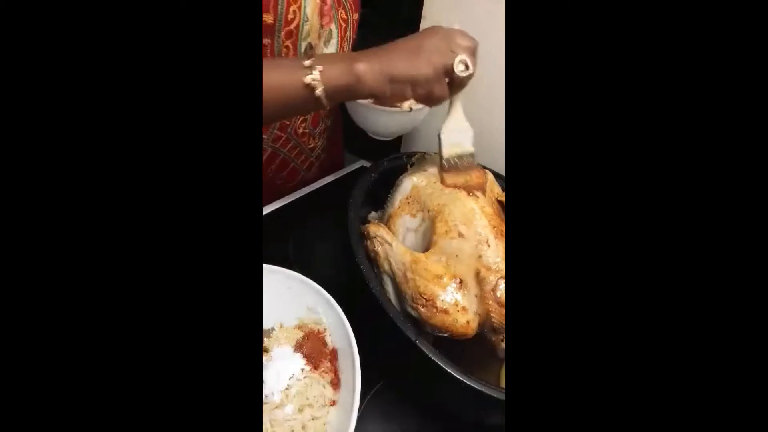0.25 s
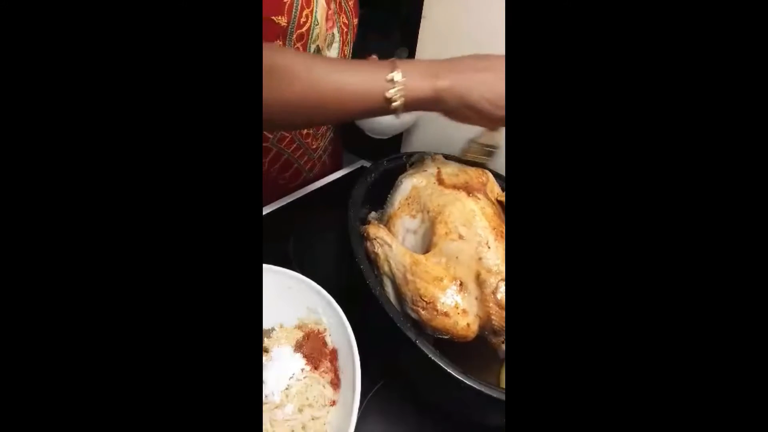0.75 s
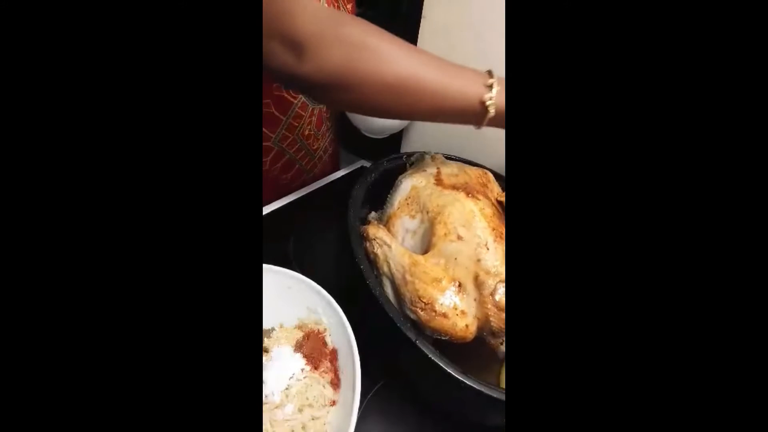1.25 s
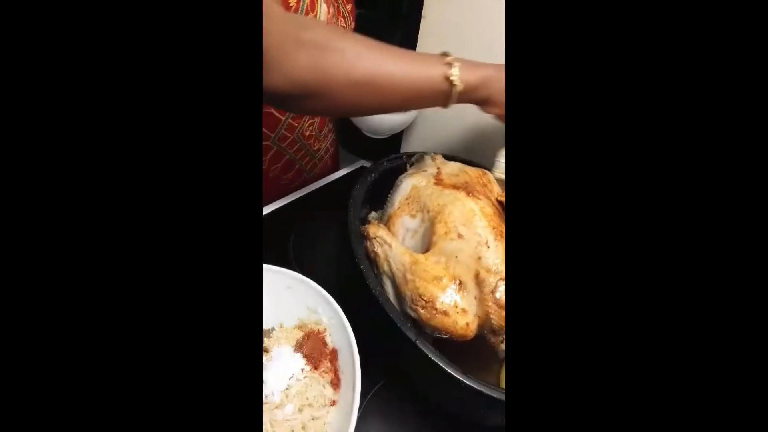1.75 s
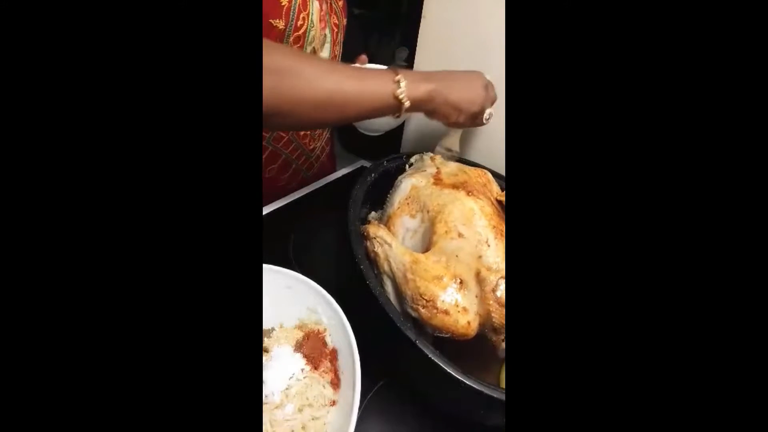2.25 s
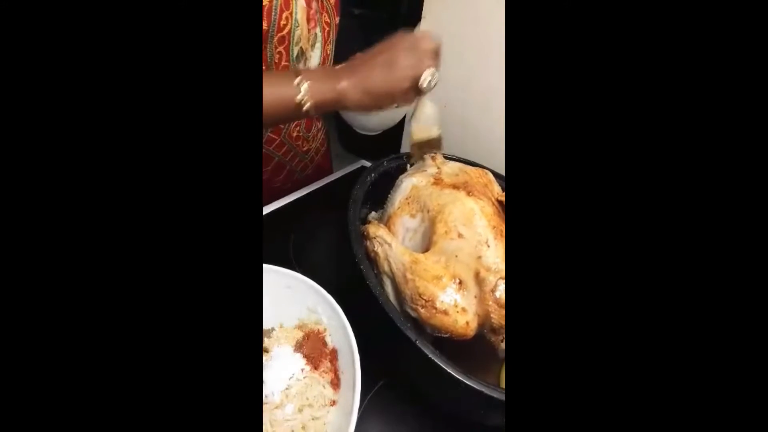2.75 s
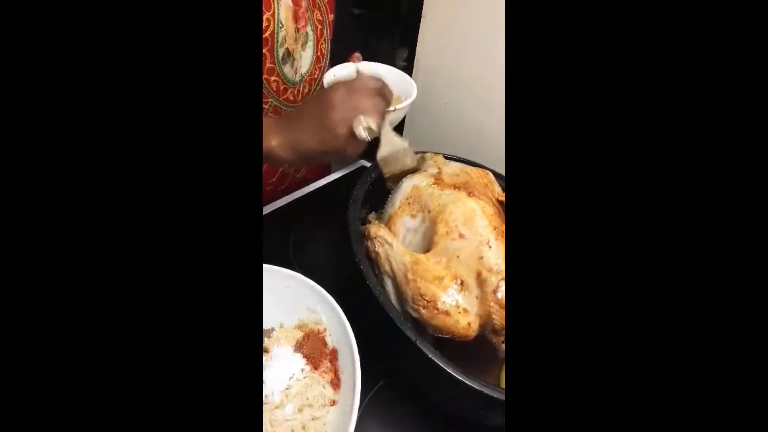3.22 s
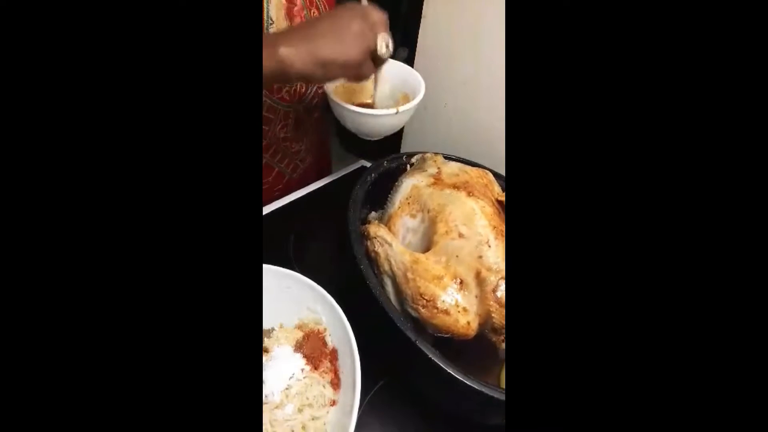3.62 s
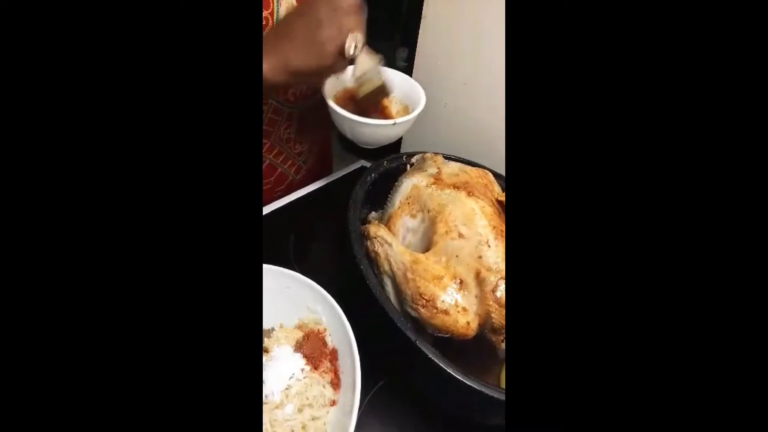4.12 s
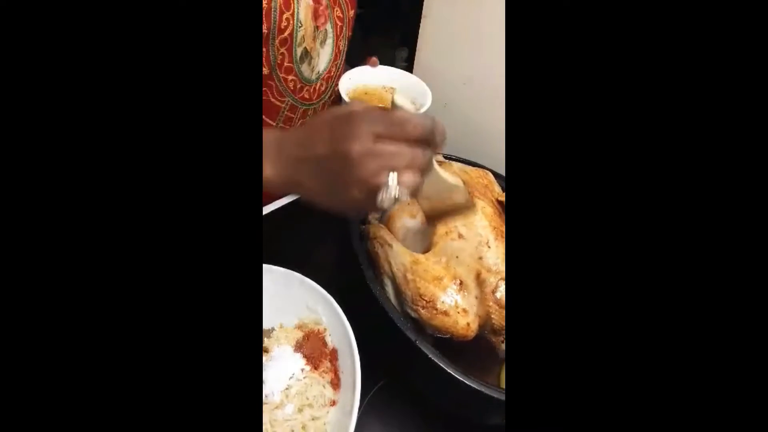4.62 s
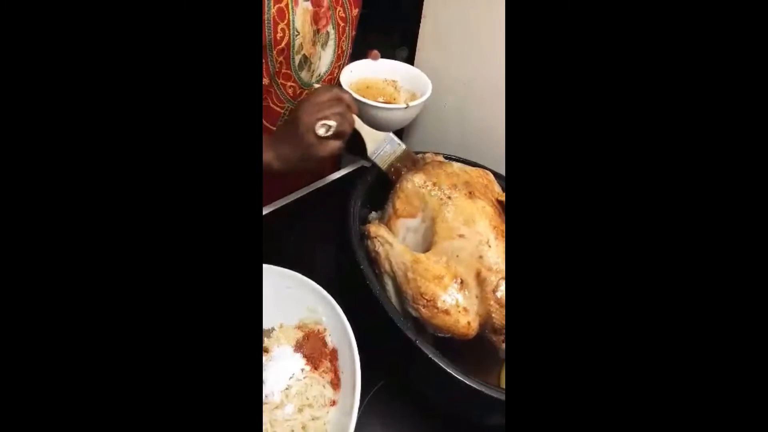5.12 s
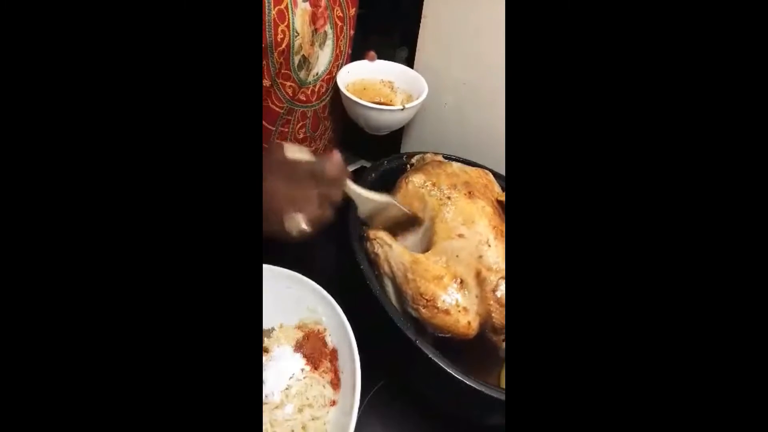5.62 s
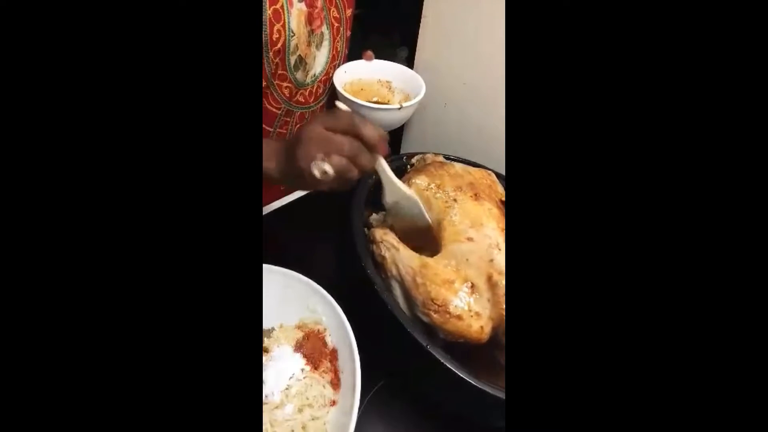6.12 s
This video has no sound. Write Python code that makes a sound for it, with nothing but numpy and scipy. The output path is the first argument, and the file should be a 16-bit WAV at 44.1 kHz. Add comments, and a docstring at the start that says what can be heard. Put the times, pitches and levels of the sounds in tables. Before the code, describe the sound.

Close stereo microphone in a small, short-echoing kitchen with low hum and soft air. Buttery bristles hiss, smack and pop delicately on roast skin over dull bumps. A bowl clinks and is wiped just after two seconds; brushing grows busier, then thins out. Near five seconds the brush cracks against the dish rim twice, bright with a tiny squeak, before light taps and wet strokes finish.

```python
"""A basting brush works between a ceramic bowl of melted butter and a roast in its dish, in a small kitchen.
Throughout, an appliance hums (sines) over room air and rumble (coloured noise). From the start, wet bristles
swish (clumped noise bursts), smack and pop (bubble pings) on the skin, over soft bumps (low noise). Near 2 s the
bowl clinks with its rebounds, and is wiped (dying sines); near 4 s a faint thin tone swells (narrow noise). Near
5 s the brush twice knocks and squeaks on the dish's rim (noise, gliding tone, modes); taps, drags, strokes follow."""
import sys
import numpy as np
from scipy import signal
from scipy.io import wavfile
from scipy.ndimage import uniform_filter1d

SR = 44100
rng = np.random.default_rng(int(sys.argv[2]) if len(sys.argv) > 2 else 0)


def digitize_waveform(pressure):
    """Quantize a signal to 16-bit integers and store it at the path in sys.argv[1].

    Rows of a 2-D input are taken as channels; values are limited to [-1, 1].
    """
    field = np.atleast_2d(pressure).T
    bounded = np.clip(field, -1, 1)
    quanta = np.round(bounded * 32767).astype(np.int16)
    wavfile.write(sys.argv[1], SR, quanta)


N = 280812


def amp(db):
    """Logarithmic level: decibels to amplitude gain."""
    return 10 ** (np.asarray(db) / 20)


def unit(x):
    """Normalisation: scales to rms 1."""
    return x / np.sqrt(np.mean(x ** 2) + 1e-20)


def sized(x, db, size):
    """Energy equivalence: gives x the energy of size samples per port at rms level db."""
    return x * amp(db) * np.sqrt(2 * size) / (np.linalg.norm(x) + 1e-20)


def read(points, hz):
    """Interpolation of (f/Hz, value) points on a log-frequency axis."""
    f, value = np.transpose(points)
    return np.interp(np.log(hz + 1), np.log(f + 1), value)


def add(mix, s, sound):
    """Superposition: mixes a sound in at s seconds."""
    part = mix[:, round(s * SR):][:, :sound.shape[-1]]
    part += sound[..., :part.shape[-1]]


def colour(x, points, size=2048):
    """Minimum-phase filtering: a causal response of unit energy with the given spectrum."""
    log_gain = np.log(amp(read(points, abs(np.fft.fftfreq(size, 1 / SR)))))
    spectrum = np.exp(np.conj(signal.hilbert(log_gain)))
    response = np.fft.ifft(spectrum).real[:size // 2]
    return signal.fftconvolve(x, response[None] / np.linalg.norm(response), axes=1)[:, :N]


def pair(size, alike):
    """Partial coherence: white noise at two ports sharing the fraction alike of its power."""
    shared, own = rng.standard_normal(size), rng.standard_normal((2, size))
    alike = np.clip(alike, 0, 1)
    return np.sqrt(alike) * shared + np.sqrt(1 - alike) * own


def ring(modes, lag=.0002, vary_db=0):
    """Modal superposition: dying sines of alternating sign, heights varying by spot struck, timing by port."""
    t = np.arange(SR) / SR
    total = np.zeros((2, SR))
    for k, (hz, db, t60) in enumerate(modes):
        decay = amp(db + vary_db * rng.standard_normal() - 60 * t / t60)
        port_time = t + lag * rng.uniform(-1.8, 1, (2, 1))
        total += (-1) ** k * decay * np.sin(2 * np.pi * hz * port_time)
    return total


def shade(x, spread=.002, depth=0.65, count=4):
    """Comb interference: a few very short echoes off nearby surfaces give each contact its own colour."""
    echoes = np.zeros((2, int(spread * SR) + 4))
    echoes[:, 0] = 1
    at = rng.integers(3, echoes.shape[1], count)
    echoes[:, at] = depth * (rng.choice([-1, 1], count) + .5 * rng.standard_normal((2, count)))
    return signal.fftconvolve(x, echoes / np.linalg.norm(echoes, axis=1, keepdims=True), axes=1)


def wander(per_s):
    """Slow random modulation: a curve of about unit size."""
    return np.interp(np.arange(N) / SR * per_s, np.arange(256), rng.standard_normal(256))


def patchy(x, depth_db, patch_s, patch_hz):
    """Time-frequency modulation: the colour of a sound shifts in patches."""
    z = signal.stft(x, SR, nperseg=1024)[2]
    field = rng.standard_normal(z.shape[1:])
    field = uniform_filter1d(field, max(1, round(patch_s * SR / 512)), axis=1)
    field = unit(uniform_filter1d(field, max(1, round(patch_hz * 1024 / SR)), axis=0))
    return signal.istft(z * unit(amp(depth_db * field)), SR, nperseg=1024)[1][:, :N]


PORT_LAG_S = .00022


def from_right(x):
    """Interaural-style delay: bowl and dish reach the left port a moment after the right one."""
    return np.array([np.pad(x[0], (round(PORT_LAG_S * SR), 0))[:x.shape[1]], x[1]])


def kitchen(x, treble_t60=0.21, middle_t60=0.32, bass_t60=0.45, near_t60=0.099, near_db=3, mono_hz=450,
            first_per_s=700, thicken_s=.04):
    """Reverberation, echoes only: separate ones from worktop and wall thicken into the small room's tail."""
    t = np.arange(SR // 2) / SR
    density = np.minimum(first_per_s / SR * (1 + (t / thicken_s) ** 2), 1)
    present = rng.random((2, len(t))) < density
    onset = np.clip(t / 0.0018 - 1, 0, 1)
    echoes = rng.standard_normal((2, len(t))) * present / np.sqrt(density) * onset
    hz, at, z = signal.stft(echoes, SR, nperseg=256)
    alike = np.exp(-(hz[:, None] / mono_hz) ** 2)  # long waves reach both ports alike
    z[1] = alike * z[0] + np.sqrt(1 - alike ** 2) * z[1]
    t60 = read([(400, bass_t60), (2000, middle_t60), (8000, treble_t60)], hz)[:, None]
    decay = amp(-60 * at / t60) + amp(near_db - 60 * at / near_t60)
    tail = signal.istft(z * decay, SR, nperseg=256)[1]
    return signal.fftconvolve(x, tail / np.linalg.norm(tail, axis=1, keepdims=True), axes=1)[:, :N]


# partials of the appliance: (f/Hz, rms level/dB)
HUM = [(59.4, -67.5), (119.9, -68), (161, -82), (241, -78.5), (403, -83), (603, -83.5), (645, -87),
       (725, -79.5), (768, -83.5), (804, -86.5)]
# relative spectrum of the low rumble: (f/Hz, level/dB)
RUMBLE = [(20, -20), (45, -2), (65, 0.5), (100, -2), (150, -0.5), (250, -22.5), (1000, -72)]
# relative spectrum of the room's air: (f/Hz, level/dB)
AIR = [(100, -26), (170, -16.5), (205, -12), (250, 1), (400, -4.5), (500, -17.5), (620, -2.5), (800, -2.5),
       (1150, -13.5), (2300, -23.5), (4000, -27), (6800, -28), (8100, -16), (10000, -25.5), (12500, -28.5),
       (14000, -47.5)]


def background(waver=0.15, air_db=-70, rumble_db=-75, flutter_db=4, steady_hz=250):
    """Harmonic and broadband noise: a hum, steady below and fluttering above, over gently shifting air."""
    t = np.arange(N) / SR
    hum = np.zeros((2, N))
    for hz, db in HUM:
        loose = 1 - np.exp(-(hz / steady_hz) ** 2)  # 0 for a steady partial, 1 for one that comes and goes
        phase = 2 * np.pi * (hz * t + rng.random())
        phase = phase + waver * np.sqrt(hz / HUM[0][0]) * wander(per_s=2.7)
        flutter = amp(loose * flutter_db * wander(per_s=5))
        hum += amp(db) * unit(flutter * np.sin(phase + loose * rng.uniform(-1.3, 1, (2, 1))))
    air = colour(pair(N, 0.19), [(30, -22.0)] + AIR)
    air = unit(patchy(air, depth_db=3.0, patch_s=.12, patch_hz=170))
    rumble = unit(colour(pair(N, 1.0), RUMBLE, size=8192))
    return hum + amp(air_db) * air + amp(rumble_db) * rumble


# a faint thin tone that comes and goes: (start t/s, length/s, f/Hz)
WHINE = (4.1, 0.65, 2350)


def whine(level_db=-80, width_hz=120):
    """Narrow-band filtering: a resonance turns noise into a thin tone that swells and fades."""
    s, length, hz = WHINE
    out, size = np.zeros((2, N)), round(length * SR)
    swell = pair(size, 0.34) * np.hanning(size)
    tone = signal.lfilter(*signal.iirpeak(hz, hz / width_hz, SR), swell)
    add(out, s, sized(tone, level_db, size / 2))
    return out


# soft bumps of the roast and dish giving under the brush: (t/s, level/dB, length/s)
BUMPS = [(0.328, -74, 0.058), (2.058, -53, 0.058), (2.893, -65.5, 0.13), (3.259, -61, 0.087),
         (3.637, -58, 0.12), (3.768, -61.5, 0.08), (5.228, -56.5, 0.092), (5.863, -60, 0.095),
         (5.979, -57.5, 0.049)]
# dull resonances, the same for every bump, relative: (f/Hz, level/dB)
BUMP = [(40, -45), (90, -20), (165, 4.5), (200, -16), (270, -21), (335, -6.5), (420, -18), (900, -44)]


def bumps():
    """Forced low resonance: each push is a swell of noise in the low resonances of roast and dish."""
    out = np.zeros((2, N))
    for s, db, length in BUMPS:
        size = round(length * SR)
        push = pair(size, 1.0) * np.hanning(size)
        add(out, s, sized(colour(push, BUMP, size=4096), db, size / 2))
    return out


def scrape(body, length, db, slips_per_s=600, uneven_db=4):
    """Stick-slip excitation: a run of uneven slips swells and fades, each one ringing the body."""
    size = round(length * SR)
    count = 2 + int(slips_per_s * length)
    slips = np.zeros((1, size))
    heights = rng.choice([-1, 1], count) * amp(uneven_db * rng.standard_normal(count))
    slips[0, rng.integers(0, size, count)] = heights
    return sized(signal.fftconvolve(slips * signal.windows.tukey(size, .5), body, axes=1), db, size)


# the pressed brush sets the dish and its own stock going, before the left trim and the room:
# (t/s, length/s, dish level/dB, stock level/dB)
DRAGS = [(4.977, 0.056, -52.5, -55.5), (5.719, 0.047, -67, -88), (5.803, .06, -67, -73),
         (5.863, .085, -54, -61.5), (6.312, 0.043, -73, -67.5)]
# the bristles wipe over the bowl's lip and keep it singing, before trim and room: (t/s, length/s, level/dB)
WIPES = [(2.262, 0.094, -64.5)]


def drags(damped_t60=0.2, left_db=-2, room_db=-8):
    """Friction-driven modes: the brush shakes the dish, damped by the pressing hand, and wipes the bowl."""
    out = np.zeros((2, N))
    dish = ring(THUD, lag=.0001) * amp(-60 * np.arange(SR) / SR / damped_t60)
    for s, length, dish_db, stock_db in DRAGS:
        add(out, s, scrape(dish, length, dish_db))
        add(out, s, scrape(ring(STOCK, lag=.00007, vary_db=3.5), length, stock_db))
    for s, length, db in WIPES:
        add(out, s, scrape(ring(BOWL, lag=.00006), length, db))
    return from_right(out) * amp([[left_db], [0]]) + amp(room_db) * kitchen(out)


# light taps of the brush's stock on the dish, gain on its ring: (t/s, level/dB)
TAPS = [(2.903, -58.5), (3.194, -61), (4.933, -44.5), (4.989, -50), (5.011, -47), (5.428, -39.5),
        (5.441, -47.5), (6.0095, -39), (6.053, -56), (6.063, -61.5), (6.099, -59)]
# short ring of the stock, mean relative heights: (f/Hz, level/dB, t60/s)
STOCK = [(606, -3, 0.079), (686, -5, 0.057), (1120, -9, 0.022), (1247, -5.5, 0.041), (1782, -6, 0.043),
         (2210, -3.5, 0.033), (2600, -1, 0.035), (2905, -4.5, 0.029), (3286, -5, 0.04), (4360, -11, 0.046)]


def taps(room_db=-11):
    """Impulsive excitation: the stock of the brush rings briefly wherever it touches the dish."""
    out = np.zeros((2, N))
    for s, db in TAPS:
        add(out, s, amp(db) * ring(STOCK, lag=.00007, vary_db=3))
    return out + amp(room_db) * kitchen(out)


# single bubbles of butter that pop out clearly: (t/s, peak level of the ping's envelope/dB, f/Hz, decay/s)
POPS = [(.3455, -45.5, 6580, 0.0017), (.345, -51.5, 4040, 0.0015), (0.381, -48, 8400, .0008),
        (0.379, -74, 3660, 0.0034), (.741, -39.5, 8370, 0.00024), (2.3378, -48, 10400, 0.00019),
        (2.707, -36, 9060, 0.00032), (2.714, -40, 8250, 0.00037), (2.722, -50, 8600, 0.0033),
        (2.903, -50, 8900, 0.0027), (2.918, -38, 8900, .0006), (2.9562, -43.5, 8850, .001),
        (2.998, -46, 8750, 0.0011), (3.0603, -43.5, 8900, 0.0012), (3.181, -38.5, 9040, 0.00053),
        (3.183, -53, 7040, 0.0026), (3.195, -48, 8200, 0.00066), (3.312, -38, 9100, 0.0014),
        (3.618, -42.5, 8350, .0005), (4.899, -65, 8740, 0.00055), (5.7172, -49, 6770, .0008),
        (5.7392, -48, 6270, 0.0013), (5.753, -48.5, 6550, 0.0017), (5.911, -33.5, 9900, 0.00023),
        (5.9853, -53, 6750, .0012), (6.0089, -31, 8700, 0.00052), (6.1, -47, 7440, 0.00053),
        (6.179, -38, 8260, 0.00029)]


def pops(snap_db=-13, snap_s=.0004, room_db=-10, lag=.00002):
    """Bubble resonance: a film of butter snaps and the bubble under it pings."""
    out, t = np.zeros((2, N)), np.arange(SR // 25) / SR
    for s, db, hz, decay in POPS:
        envelope = t / decay * np.exp(1 - t / decay)
        ping = envelope * np.sin(2 * np.pi * hz * (t + lag * rng.uniform(-0.86, 1, (2, 1))))
        snap = colour(pair(len(t), 0.46) * np.exp(-t / snap_s), BRISTLES)
        add(out, s, amp(db) * ping)
        add(out, s, amp(db + snap_db) * snap)
    return out + amp(room_db) * kitchen(out)


def bubbles(length, hz, per_s=450, spread=0.147, cycles=11, lag=.00004):
    """Bubble resonance in series: tiny bubbles burst one after another, each a ping of its own pitch."""
    t = np.arange(round((length + .01) * SR)) / SR
    out = np.zeros((2, len(t)))
    count = 2 + int(per_s * length)
    for at in (np.arange(count) + rng.random(count)) / count * length:
        pitch = np.clip(hz * np.exp(spread * rng.standard_normal()), 3000, 10800)
        age = np.maximum(t - at - lag * rng.uniform(0, 2.57, (2, 1)), 0) * pitch  # in cycles
        height = rng.uniform(0.65, 1, (2, 1)) * np.exp(-at / length)
        out += height * age / cycles * np.exp(-2 * age / cycles) * np.sin(2 * np.pi * age)
    return out


# bristles land on or peel off the skin, base level before the part trims:
# (t/s, level/dB, length/s, slap relative to base/dB, centre of the butter's fizz f/Hz)
SMACKS = [(0.343, -43, 0.015, -13, 7600), (0.376, -49, 0.01, -7.5, 9160), (1.363, -53.5, 0.0058, -27, 8670),
          (2.232, -67, .005, 0, 8200), (2.296, -61, 0.0045, -14, 8800), (2.334, -53, 0.011, -6, 6500),
          (2.367, -55, 0.0039, -13, 8900), (2.625, -48, 0.0064, -19, 9000),
          (2.709, -46.5, 0.017, -12, 8200), (2.89, -61.5, 0.012, 3, 8560), (2.915, -41, 0.0081, -15, 8850),
          (2.956, -47.5, 0.0047, -14, 8900), (2.995, -48.5, 0.011, -3.5, 8160),
          (3.051, -43.5, .018, -17.5, 8460), (3.176, -45.5, 0.013, -8, 8300), (3.29, -51, 0.011, -20, 9300),
          (3.309, -41, 0.008, -22, 9400), (3.617, -54.5, .004, -14, 8760), (3.656, -63, 0.027, -9, 5020),
          (4.473, -53.5, 0.023, -9.5, 5050), (4.472, -50, 0.02, -7, 8100),
          (4.675, -46.5, 0.0047, -11.5, 9250), (4.711, -48, 0.004, -10, 9000),
          (4.982, -45.5, .006, -4, 8000), (5.007, -42, 0.006, -2, 8700), (5.026, -49, 0.0094, -3.5, 8460),
          (5.07, -44, 0.0082, -24, 8150), (5.639, -52, 0.0089, -10, 9100), (5.714, -45, 0.0049, -14, 8900),
          (5.736, -49, 0.0097, -5.5, 8800), (5.751, -51, 0.011, -5.5, 8200),
          (5.817, -51, 0.014, -11.5, 8940), (5.983, -46.5, 0.016, -7, 8260), (6.01, -36.5, 0.01, -5, 8800),
          (6.101, -50, 0.02, -4, 8360), (6.161, -55, 0.0085, -3, 8650), (6.255, -53, 0.0062, -3.5, 9100),
          (6.32, -52, 0.011, -2, 8800)]
# relative spectrum of the fleshy slap: (f/Hz, level/dB)
SLAP = [(100, -15.5), (250, 3.5), (450, -3.5), (700, 7), (1100, -1), (1700, -6), (2500, -8), (3800, -3.5),
        (6000, -7.5), (12000, -34)]


def smacks(grain_db=6.0, skirt_db=-12, room_db=-7, rise_share=0.52, fizz_db=-5.0, bubble_db=-2):
    """Burst superposition: each smack is a clump of bursting butter bubbles and fizz over a soft slap."""
    out = np.zeros((2, N))
    for s, db, length, slap_db, hz in SMACKS:
        fizz = [(1000, -35), (hz * 0.52, skirt_db), (hz * 0.56, -5), (hz, 0), (hz * 1.23, -6),
                (hz * 1.37, -19), (14000, -44)]
        t, size = np.arange(round(2 * length * SR)) / SR, length * SR * 0.39
        swell = np.minimum(t / (rise_share * length), 1) * np.exp(-(t / length) ** 2)
        grains = amp(grain_db * np.minimum(rng.exponential(1, len(t)), 4))
        crackle = shade(pair(len(t), 0.4) * grains * swell)
        add(out, s, sized(bubbles(length, hz), db + bubble_db, size))
        add(out, s, sized(colour(crackle, fizz), db + fizz_db, size))
        add(out, s, sized(colour(crackle, SLAP), db + slap_db, size))
    return out + amp(room_db) * kitchen(out)


# a clump of bristles bends onto the skin, then trails off it; CLUMP_S is the mean spacing in long strokes
CLUMP_S, CLUMP_ATTACK_S, CLUMP_RELEASE_S = .022, 0.019, 0.018


def bristle_drive(length, grain_db=6, flicks_per_s=1100):
    """Clustered release: clump after clump of bristles lets go, each a burst of flicks of its own colour."""
    t, out = np.arange(round(4 * CLUMP_S * SR)) / SR, np.zeros((2, SR // 3))
    count = max(2, round(length / CLUMP_S))
    for along in (np.arange(count) + rng.uniform(0, .5, count)) / count:
        sizes = amp(grain_db * np.minimum(rng.exponential(1, len(t)), 3.5))
        flicks = np.interp(t * flicks_per_s, np.arange(len(t)), sizes)
        burst = np.minimum(t / CLUMP_ATTACK_S, 1) * np.exp(-t / CLUMP_RELEASE_S)
        add(out, along * length, shade(pair(len(t), 0.12) * flicks * burst))
    return out


# strokes over the skin, rub of the pressed brush before its trim:
# (start t/s, length/s, hiss level/dB, rub level/dB)
STROKES = [(0.296, 0.042, -61, -69.5), (0.387, 0.056, -60.5, -71), (0.524, 0.058, -65.5, -101),
           (0.809, 0.032, -64.5, -91), (0.878, 0.14, -63, -73), (1.28, 0.059, -70.5, -78),
           (1.546, 0.033, -65.5, -74), (2.236, 0.14, -51.5, -60.5), (2.39, 0.035, -66.5, -74),
           (2.574, .035, -65.5, -75), (2.92, .015, -53.5, -56.5), (2.968, 0.067, -56, -64.5),
           (3.048, 0.026, -59, -61.5), (3.205, 0.017, -57, -64), (3.274, 0.057, -54.5, -62),
           (3.887, 0.071, -70.5, -72), (4.49, 0.096, -70, -67.5), (4.975, 0.069, -46, -51.5),
           (5.076, 0.084, -55.5, -66), (5.2, 0.031, -66, -70.5), (5.571, .14, -67.5, -75.5),
           (5.624, 0.029, -59, -73.5), (5.739, 0.037, -52, -63), (5.791, 0.18, -61, -69),
           (5.877, 0.054, -51.5, -63.5), (6.031, 0.029, -54, -64), (6.125, 0.083, -70.5, -77.5),
           (6.248, 0.055, -60.5, -65.5), (6.297, 0.055, -55, -60)]
# runs of light, evenly paced dabs: (start t/s, end t/s, from dab to dab/s, hiss level/dB)
DABS = [(1.216, 1.6, 0.16, -65), (1.652, 1.8, 0.075, -64), (1.889, 2.05, 0.11, -60),
        (4.555, 4.87, .08, -59.5)]
DAB_S, DAB_RUB_DB = 0.017, -10  # length of one dab; its rub relative to its hiss, before the rub trim
# relative spectrum of the bristles' hiss: (f/Hz, level/dB)
BRISTLES = [(1500, -35), (4000, -9.5), (5500, -6.5), (7000, -2), (8700, 4.5), (10000, -1.5), (11500, -11.5),
            (12900, -12), (13700, -42)]
# relative spectrum of the duller rub: (f/Hz, level/dB)
RUB = [(150, -14.5), (300, 6), (500, -3.5), (750, 11.5), (1200, 1.5), (2000, -6.5), (3400, -1),
       (4600, -1.5), (6500, -2.5), (9000, -25.5)]


def strokes(rub_db=2.0, room_db=-5, crackle_db=-8, crackle_hz=5600):
    """Friction noise: bristles hiss and crackle on buttered skin, pressing adds a rub; a dab is a short stroke."""
    dabs = [(s, DAB_S, db, db + DAB_RUB_DB)
            for start, end, gap, db in DABS for s in np.arange(start, end, gap)]
    out, crackle = np.zeros((2, 2, N))
    for s, length, db, press_db in STROKES + dabs:
        drive, size = bristle_drive(length), length * SR / 2
        early = s - CLUMP_ATTACK_S / 2
        add(out, early, sized(colour(drive, BRISTLES), db, size))
        add(out, early, sized(colour(drive, RUB), press_db + rub_db, size))
        popping = bubbles(length, crackle_hz, per_s=300, spread=.28, cycles=20)
        add(crackle, s, sized(popping, db + crackle_db, size))
    wet = amp(room_db) * kitchen(out + crackle)
    # the colour changes as the bristles splay
    return crackle + patchy(out + wet, depth_db=4.5, patch_s=.05, patch_hz=260)


# contacts on the ceramic bowl, gains before trim, damping and room: (t/s, scrape level/dB, ring level/dB)
CLINKS = [(2.075, -32.5, -38), (2.0829, -35.5, -39), (2.0895, -43, -42.5), (2.1, -41, -47.5),
          (2.15, -48.5, -61)]
# free ring of the bowl, mean relative heights: (f/Hz, level/dB, t60/s)
BOWL = [(629, 5.5, 0.055), (716, 4.5, 0.22), (1071, 1.5, 0.27), (1273, 10, 0.074), (1274, -5, 0.59),
        (1317, 2, 0.42), (1410, 11, 0.18), (1428, 3.5, 0.4), (1726, -2.5, 0.48), (1853, -8, 0.43),
        (2100, -5, 0.33), (2392, -3, 0.12), (2444, -12, 0.27), (2700, 0.5, 0.11), (3144, -4, 0.21),
        (3784, -14, 0.23), (4650, -5, 0.067), (6400, -5, 0.062), (7400, -1, .04)]
# relative spectrum of the short scrape: (f/Hz, level/dB)
CLINK_TICK = [(100, -21), (300, -12.5), (500, -13), (700, -11), (1400, -1), (2100, -13), (3200, -12),
              (4000, -17.5), (8500, -14.5), (10500, -22), (13000, -59)]


def clinks(tick_t60=0.085, ring_room_db=-4, tick_room_db=-1, left_db=-2.5, rise=0.0024, damp_db=-5,
           damp_s=0.029):
    """Damped modal ringing: a glancing blow and rebounds scrape and ring the bowl as the brush settles on it."""
    rings, ticks = np.zeros((2, 2, N))
    t = np.arange(SR) / SR
    soft = np.minimum(t / rise, 1)
    damping = amp(damp_db * np.minimum(t / damp_s, 1) ** 2)
    for s, tick_db, ring_db in CLINKS:
        add(rings, s, amp(ring_db) * soft * damping * ring(BOWL, lag=0.00006, vary_db=1.5) / 2)
        tick = shade(pair(SR, 0.64) * soft * amp(-60 * t / tick_t60))
        add(ticks, s, amp(tick_db) * colour(tick, CLINK_TICK) / 2)
    wet = kitchen(amp(ring_room_db) * rings + amp(tick_room_db) * ticks)
    return (from_right(rings + ticks) + wet) * amp([[left_db], [0]])


# relative spectrum of the dish's shudder: (f/Hz, level/dB)
BOOM = [(100, -29.5), (220, -11.5), (400, 2.5), (530, -5.5), (780, -2), (1100, -13.5), (1600, -15),
        (2200, -26), (5000, -50.5)]


def booms(boom_db=-13, t60=0.18, rise_s=0.0096, left_db=-3):
    """High modal density: under each knock the loaded dish shudders, too dense to have a pitch."""
    out, t = np.zeros((2, N)), np.arange(SR // 3) / SR
    for s, clack_db, squeak_db, thud_db, *rest in KNOCKS:
        shudder = pair(len(t), .8) * np.minimum(t / rise_s, 1) * amp(-60 * t / t60)
        add(out, s, sized(colour(shudder, BOOM), thud_db + boom_db, SR / 50))
    return from_right(out) * amp([[left_db], [0]])


# the contact stiffens as it is pressed, so its squeak rises
SQUEAK_FROM_HZ, SQUEAK_TO_HZ = 6750, 8720


def squeak(length, slips_per_s=850, depth=0.38, first=0.95, bend=1.663):
    """Stick-slip friction: quick slips on the glaze, a throbbing tone that rises and grows along the contact."""
    along = np.linspace(0, 1, round(length * SR))
    hz = SQUEAK_FROM_HZ + (SQUEAK_TO_HZ - SQUEAK_FROM_HZ) * along ** bend
    slips = 1 - depth * np.cos(2 * np.pi * slips_per_s * length * along ** bend)  # slips_per_s is the mean
    force = (first + (1 - first) * along) * slips * signal.windows.tukey(len(along), .15)
    return force * np.sin(2 * np.pi * (np.cumsum(hz) / SR + rng.uniform(0, 0.31, (2, 1))))


# hard knocks on the dish's rim, levels before trims and room: (t/s, clack level/dB, squeak level/dB,
# thud level/dB, slip-off thud level/dB, rim ring level/dB, chattering contact length/s,
# force at first touch 0-1 before chatter, level of the clack sent to the room/dB)
KNOCKS = [(4.917, -13.5, -24.5, -24, -23.5, -42, 0.00909, 0.7, -1.5),
          (5.413, -15, -16, -38.5, -31.5, -36.5, .0075, 0.15, -3.5)]
# colour of each knock's clack, set by the spot struck; per knock, relative: (f/Hz, level/dB)
CLACKS = [
    [(600, -17.5), (1300, -24), (1800, -23), (2100, -26.5), (3300, -27.5), (3650, -12.5), (4300, -17),
     (5700, -15.5), (6800, 1), (7550, -3.5), (7850, -16.5), (8300, -1.5), (9500, 0.5), (10100, -8),
     (11000, -5), (12500, -19), (13800, -46)],
    [(600, -22.5), (1300, -21), (1850, -28.5), (2250, -12.5), (3500, -18), (4400, -18), (5200, -16),
     (6350, -11.5), (6750, 0.5), (7550, -0.5), (7850, -10), (8150, 0), (9400, -1.5), (10700, -15.5),
     (12100, -10.5), (12700, -22), (13800, -42)],
]
# free low body of the dish, relative: (f/Hz, level/dB, t60/s)
THUD = [(196.6, -12.5, 0.13), (234, -10.5, 0.13), (278, -11, 0.07), (311, -7, .12), (377, -7, .08),
        (393.2, -1.5, 0.17), (434, -8.5, 0.15), (468, -9.5, 0.19), (597, -6, 0.2), (672, -7, 0.27),
        (686, -7, 0.15), (756, 1.5, 0.14), (799, 1, 0.13), (837, -1, 0.11), (933, -11.5, .1),
        (986, -4.5, 0.12), (1132, -15, 0.19), (1430, -15, .14), (1600, -17.5, 0.13)]
# relative spectrum of the blow's dull shove: (f/Hz, level/dB)
PUSH = [(60, -25.5), (160, -23.5), (240, -2), (400, 7.5), (520, -16.5), (700, -9), (830, 0.5), (1100, -28),
        (2000, -44), (6000, -61.5)]
# high ring of the dish's rim, mean relative heights: (f/Hz, level/dB, t60/s)
RIM = [(1810, -17, 0.13), (2310, -8.5, 0.22), (2580, -11, 0.16), (2616, -6, 0.26), (2840, -7.5, 0.19),
       (3390, -5, 0.2), (3500, -4, .11), (3644, -1.5, 0.11), (6735, 2.5, 0.17), (7300, 1, .2),
       (7350, 2.5, .19), (8161, 2.5, .15), (8500, 6, .11), (9400, 0.5, .15)]


def knocks(thud_rise=0.00033, thud_lead=0.003005, thud_room_db=-10, thud_left_db=-3, graze_db=-24,
           graze=.004, push_db=1.0, chatter_db=3, bite_s=0.0006, settle_s=.003, settle_db=-9):
    """Impact and friction: the brush grazes the rim, chatters and squeaks harder, slips off; the dish rings."""
    clacks, echoes, thuds = np.zeros((3, 2, N))
    soft = np.minimum(np.arange(SR) / SR / thud_rise, 1)
    for knock, tone in zip(KNOCKS, CLACKS):
        s, clack_db, squeak_db, thud_db, slip_db, rim_db, length, first_touch, room_db = knock
        size, t = round(length * SR), np.arange(SR // 25) / SR - graze
        pressing = np.interp(t, [-graze, 0, bite_s, length], [0, amp(graze_db), first_touch, 1])
        settling = amp(settle_db) * np.exp(-abs(t - length) / settle_s)
        force = np.where(t < length, pressing, settling)
        force = force * amp(chatter_db * np.minimum(rng.exponential(1, len(force)), 4))
        clack = sized(colour(pair(len(force), 0.28) * force, tone), clack_db, size)
        add(clack, graze, sized(squeak(length), squeak_db, size))
        add(clacks, s - graze, clack)
        add(clacks, s + length / 2, amp(rim_db) * soft * ring(RIM, lag=.00005, vary_db=0.5) / 2)
        add(echoes, s - graze, amp(room_db) * clack)
        thud = ring(THUD, lag=0.0001) * soft / 2
        add(thuds, s - thud_lead, amp(thud_db) * thud)
        add(thuds, s + length, amp(slip_db) * thud)
        shove = colour(np.ones((2, 1)), PUSH)  # a single impulse, coloured
        add(thuds, s + length / 2, sized(shove, thud_db + push_db, size))
    thuds = from_right(thuds) * amp([[thud_left_db], [0]])
    return clacks + thuds + kitchen(echoes + amp(thud_room_db) * thuds)


def scene():
    """Linear superposition of all sources at the two microphone ports."""
    surroundings = background() + whine()
    brushing = bumps() + drags() + taps() + pops() + smacks() + strokes()
    return surroundings + brushing + clinks() + booms() + knocks()


EDGE_HZ = 15800  # band limit


def record(dry):
    """Band limitation: the microphone's top rolls off; then the full-scale limit and the band limit."""
    heard = signal.sosfilt(signal.butter(6, 13300, fs=SR, output="sos"), dry)
    band = signal.firwin(255, EDGE_HZ, window=("kaiser", 9), fs=SR)
    return signal.oaconvolve(np.clip(heard, -1, 1), band[None], "same")


dry = scene()
out = record(dry)
digitize_waveform(out)
```